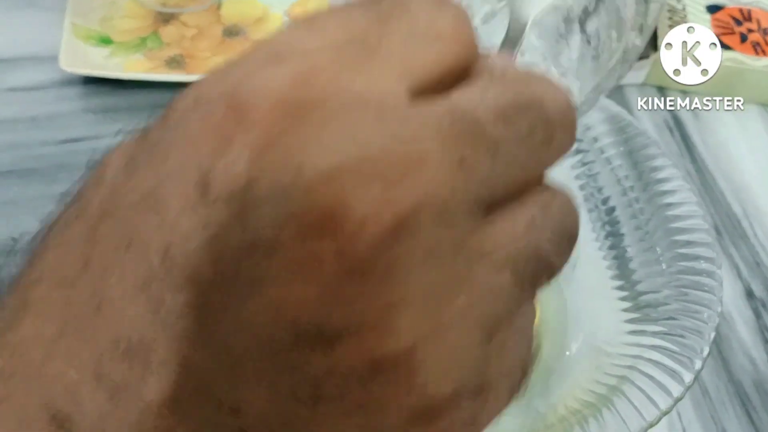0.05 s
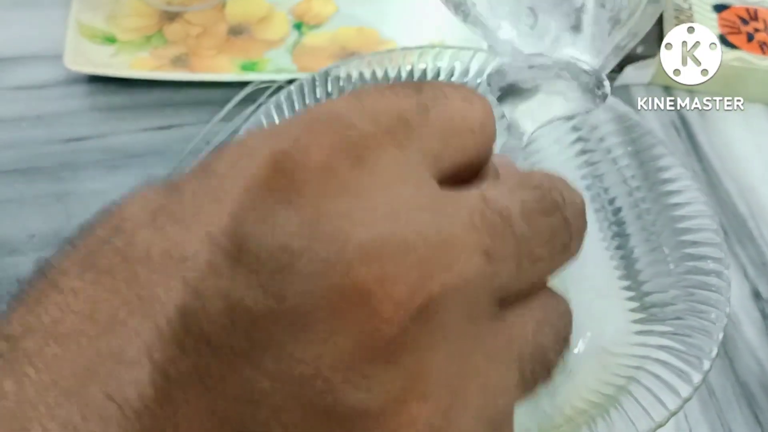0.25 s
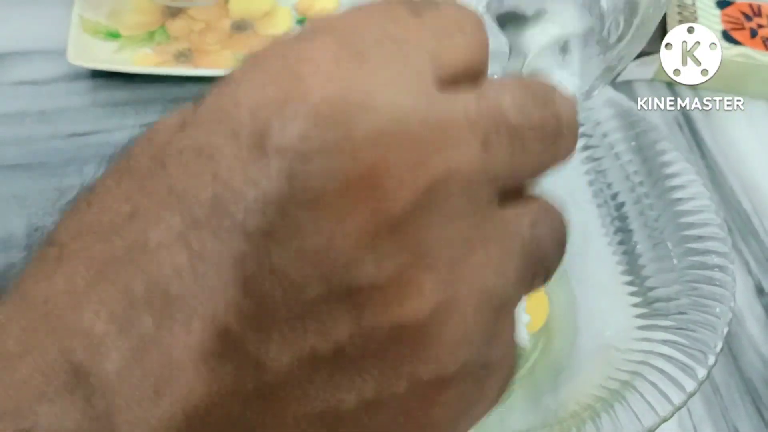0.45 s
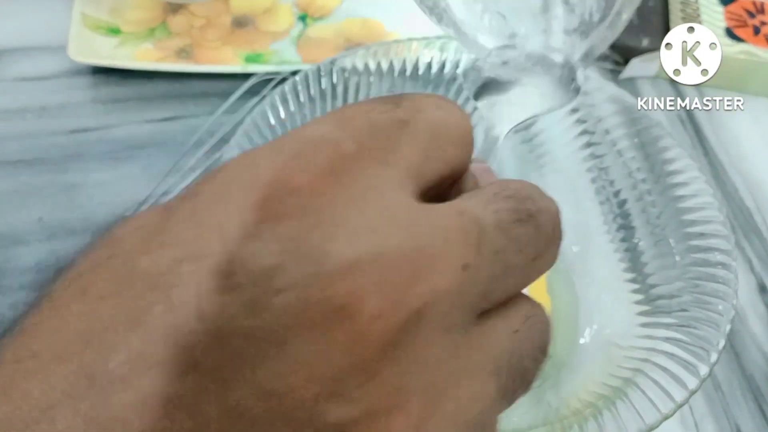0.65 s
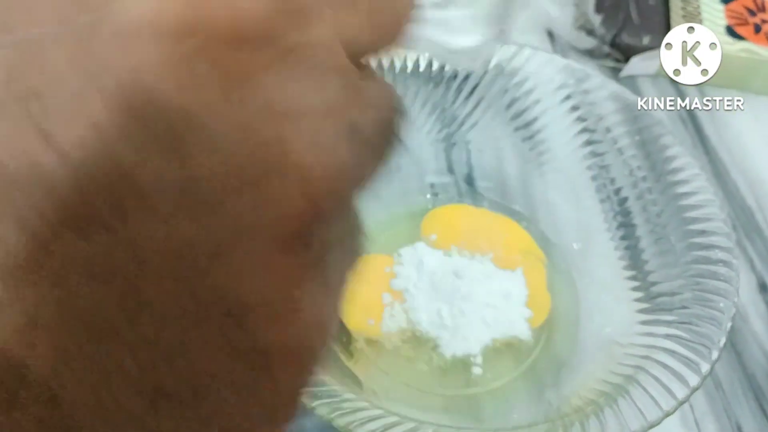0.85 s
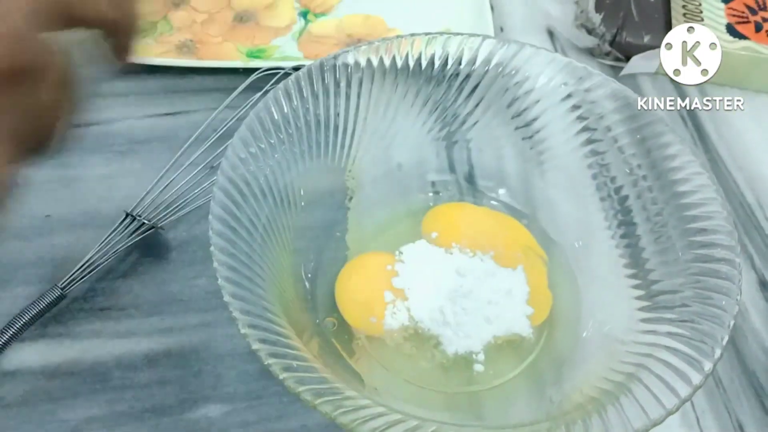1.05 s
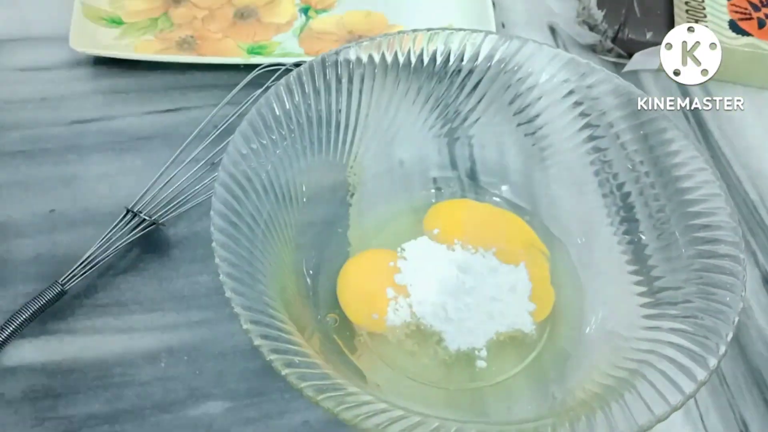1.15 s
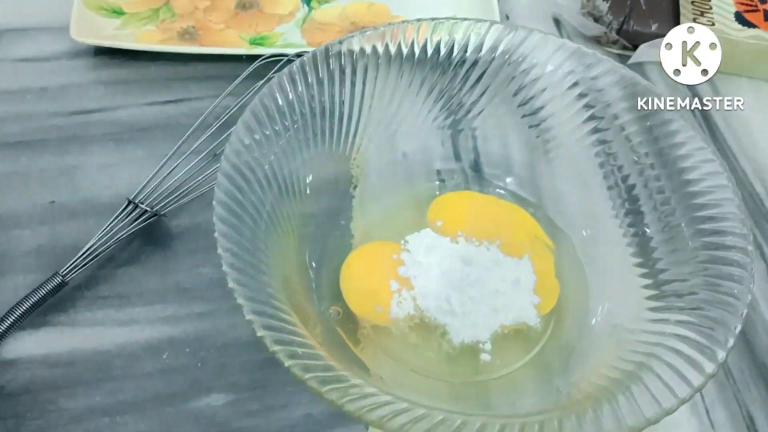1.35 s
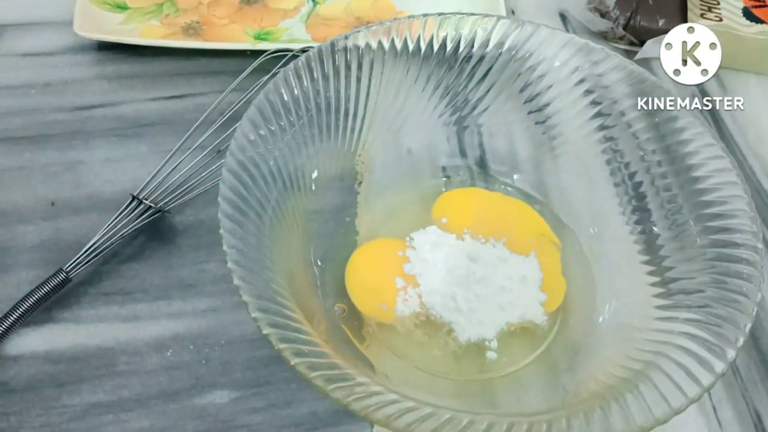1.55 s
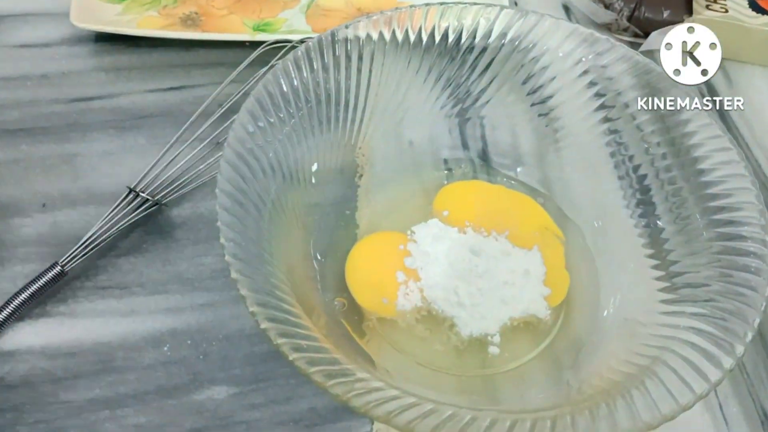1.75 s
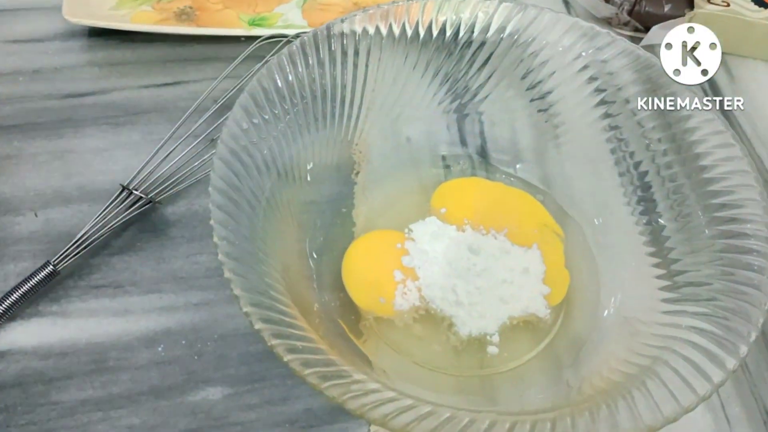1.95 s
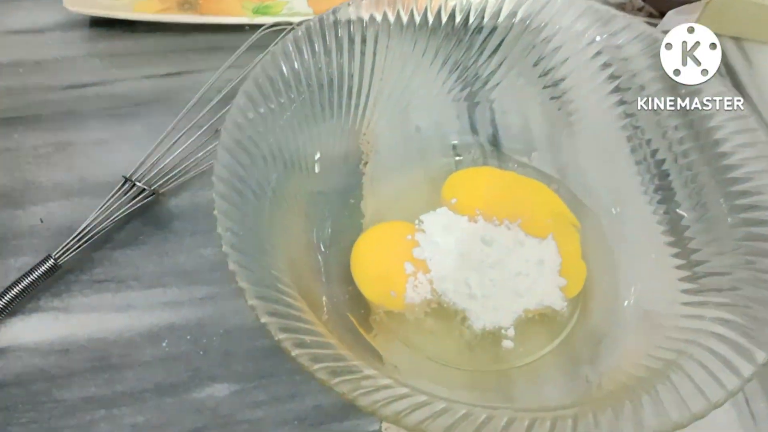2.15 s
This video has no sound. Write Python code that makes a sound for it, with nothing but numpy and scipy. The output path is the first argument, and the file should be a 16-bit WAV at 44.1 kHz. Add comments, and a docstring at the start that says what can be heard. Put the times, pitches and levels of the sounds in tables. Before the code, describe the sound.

A small glass cup taps and chatters on a glass bowl's rim, close by. The strongest clinks come at about 0.2, 0.4 and 0.7 seconds, the latter two leaving the bowl ringing. Lighter taps follow until 1.1 seconds. At 1.7 seconds the cup knocks down on a stone counter with a faint low boom, rocks flat and rings briefly. The kitchen around it is quiet.

```python
"""Glass cup on bowl and counter.

A small empty glass cup is tapped on the rim of a glass bowl: each contact is a knock, a click and a
short ring (damped modes, shaped noise). The hardest taps leave the bowl ringing. The cup is then set
down on a stone counter, which booms faintly. Small kitchen reverb over still air and a quiet mains hum."""
import sys
import numpy as np
from scipy import signal
from scipy.fft import rfft, irfft, next_fast_len
from scipy.io import wavfile

SR = 44100
rng = np.random.default_rng(int(sys.argv[2]) if len(sys.argv) > 2 else 0)


def output_pcm(signal):
    """Save a mono or channel-first signal as 16-bit PCM at the path in sys.argv[1].

    Samples are clipped to [-1, 1] before scaling.
    """
    pcm = np.clip(np.atleast_2d(signal).T, -1, 1) * 32767
    wavfile.write(sys.argv[1], SR, np.round(pcm).astype(np.int16))


N = 97020

# air spectrum: freq_hz, density_db
AIR_SPECTRUM = [(25, -8.5), (100, -2.5), (160, -9), (300, -8.5), (600, -11.5), (1000, -24), (1600, -25),
                (2500, -18.5), (7300, -19), (15500, -22.5)]
# air, left-right: freq_hz, coherence
AIR_COHERENCE = [(40, 0.93), (100, 0.27), (500, 0.3), (10000, .1)]
# mains hum: pitch_hz, rms_db
HUM_PARTIALS = [(98, -73.5), (297, -76.5)]
# kitchen reverb decay: freq_hz, t60_s
ROOM_DECAY = [(200, 1), (600, 0.35), (1500, 0.42), (3500, 0.39), (7000, 0.43), (14000, 0.26)]
# kitchen reverb colour: freq_hz, gain_db
ROOM_SPECTRUM = [(150, -5), (500, 2), (1200, -1), (3200, 2.5), (6500, -2), (9000, -1), (14000, -0.5)]
# resonances of the closing hiss: pitch_hz, level_db, t60_s
HISS_MODES = [(1530, 1, 0.0037), (4600, -9, 0.0059)]
# thuds through the counter: start_s, pitch_hz, level_db, t60_s, attack_s
COUNTER_THUDS = [(.424, 50, -53.5, 0.19, 0.0024), (.424, 125, -38, 0.044, .001),
                 (.424, 324, -31, 0.021, 0.00086)]
# grazed cup edge: pitch_hz, level_db, t60_s
TICK_MODES = [(3040, -9, 0.092), (3340, -2, 0.03), (3650, -7, 0.034)]
# cup standing free: pitch_hz, level_db, t60_s
LINGER_MODES = [(495, -1, 0.74), (2960, -1, 0.74)]
# cup on counter: start_s, knock_db, click_db, base_db, wall_db, pan_db (left minus right)
COUNTER_CONTACTS = [(1.7072, -22.5, -26, -24.5, -33, -0.5), (1.727, -42, -29.5, -45, -35, -2),
                    (1.822, -36, -35.5, -36.5, -36, -3.5), (1.835, -38, -35.5, -42.5, -33, 0)]
# cup base on stone: pitch_hz, level_db, t60_s
BASE_MODES = [(2864, -4.5, 0.2), (3350, 13, 0.014), (4120, 6.5, 0.0088), (10850, -9, 0.073)]
# knock on stone: pitch_hz, level_db, t60_s
STONE_MODES = [(437, -21, 0.063), (1292, -4, 0.026), (1664, -1, 0.021), (2045, -2, 0.014),
               (2255, -0.5, 0.017), (2760, 9, 0.0062)]
# click on stone: freq_hz, density_db
STONE_CLICK_SPECTRUM = [(150, -18), (500, -2), (2200, -0.5), (4300, -2), (8500, 0), (9900, -36),
                        (11400, 2.5), (14800, -16), (16000, -41)]
# taps that ring the bowl, one per strike point: start_s, level_db, pan_db
BOWL_STRIKES = [(.424, -23.5, -5.5), (0.6681, -33.5, -6.5)]
# bowl's free ring: pitch_hz, t60_s, split_hz, first_point_db, second_point_db
BOWL_CLUSTERS = [(2860, .4, 50, -14, 0), (3320, .54, 80, -1, -1.5), (6385, .46, 48, -4, 0),
                 (7515, .45, 48, -4, -12), (8515, .4, 35, -25, -5), (11780, .4, 50, -17, -24),
                 (13065, .4, 50, -23, -7), (14190, .35, 50, -24, -16)]
# extra chinks on four rim taps: start_s, pitch_hz, level_db, t60_s
TAP_CHINKS = [(0.2315, 1524, -33, 0.033), (0.2713, 2480, -30, 0.023), (0.932, 1726, -45.5, 0.054),
              (1.083, 3430, -34, 0.037)]
# bowl's damped knock: pitch_hz, level_db, t60_s
KNOCK_MODES = [(494.4, -17, 0.099), (1221, 7.5, 0.0097), (1472, 2.5, 0.013), (1705, -0.5, 0.01)]
# click on the rim: freq_hz, density_db
RIM_CLICK_SPECTRUM = [(200, -33.5), (900, -10.5), (2700, -2), (3800, 0), (4800, 2.5), (6800, -2),
                      (8500, 0.5), (9700, -9.5), (12000, -3), (14400, -17), (16000, -33)]
# cup modes in five families, low to high: pitch_hz, level_db, t60_s
CUP_FAMILIES = [
    [(2870, -7, .035), (3335, 0, .045)],
    [(6388, 0, .045)],
    [(7540, 0, .035), (8560, -2, .032)],
    [(11450, -6, .02), (11790, 0, .03)],
    [(12370, -5, .035), (13090, 0, .04), (14250, -11, .035)],
]
# cup on rim: start_s, knock_db, click_db, five family_db, pan_db
RIM_CONTACTS = [(.001, -47.5, -39.5, -39.5, -56, -83, -71, -45, -1.5),
                (0.021, -46.5, -39.5, -42, -37, -40, -49, -42, -2),
                (0.035, -47, -39.5, -67, -42, -43, -41.5, -45, -2),
                (0.2017, -48, -18, -35, -42, -30, -23.5, -17.5, -1),
                (0.2315, -26, -27, -34, -35, -30, -48, -62, -1.5),
                (0.2341, -44.5, -30.5, -47, -57, -32, -47, -29.5, -9),
                (0.2687, -37, -42, -57, -60, -61, -65, -58, 0.5),
                (0.272, -59, -37, -35, -48, -39.5, -61, -57, 1),
                (.424, -47, -24.5, -26.5, -16, -28.5, -23.5, -31, 0),
                (0.445, -47.5, -23.5, -34, -50, -43, -46, -51, 0.5),
                (0.6682, -30.5, -21, -17.5, -17, -27, -46, -26.5, 2),
                (0.7547, -45, -29, -34, -34.5, -45, -58, -43, -1),
                (.835, -43, -40.5, -38.5, -60, -53, -69, -41.5, -6.5),
                (.845, -50.5, -42.5, -46, -60, -42, -60, -49, 10),
                (0.932, -53.5, -39, -51, -60, -47.5, -56, -48, -7.5),
                (.948, -63, -44, -57, -66, -63, -66, -62, 6),
                (1.083, -70, -38, -36.5, -35, -41, -44, -41, -6.5),
                (1.1, -59, -36.5, -40.5, -54.5, -38, -45, -52, -3.5),
                (1.109, -79, -38, -48, -33.5, -45.5, -42, -75, -2)]

RIM_CLICK_T60_S, RIM_LAG_S, RIM_ROOM_DB = 0.052, 0.00013, -7
STONE_CLICK_T60_S, STONE_LAG_S, STONE_ROOM_DB = 0.098, 0.000434, -3
BUILD_S, KNOCK_SPREAD_RAD = 0.00085, 0.2
SCENE_TIME_S, RING_TIME_S = np.arange(N) / SR, np.arange(SR) / SR
PAN_SPLIT = np.array([[.5], [-.5]])


def amp(db):
    """Decibels to gain."""
    return 10 ** (np.asarray(db) / 20)


def along(points, hz):
    """Interpolate (freq_hz, value) points on a log frequency axis."""
    freqs_hz, values = np.transpose(points)
    return np.interp(np.log(hz + 1), np.log(freqs_hz + 1), values)


def rise(attack_s, t=RING_TIME_S):
    """Exponential onset, 0 to 1."""
    return 1 - np.exp(-t / attack_s)


def burst(x, window_s=0.01):
    """Scale a transient to the energy of rms 1 over window_s."""
    return x / np.sqrt(np.mean(np.sum(x ** 2, -1)) / (window_s * SR) + 1e-20)


def filtered(x, response):
    """Apply a frequency response."""
    n = x.shape[-1]
    padded = next_fast_len(n + 8192)
    return irfft(rfft(x, padded) * response(np.fft.rfftfreq(padded, 1 / SR)), padded)[..., :n]


def at(start_s, x):
    """x on a silent stereo track, from start_s."""
    out, i = np.zeros((2, N)), round(start_s * SR)
    out[:, i:i + x.shape[-1]] = x[..., :N - i]
    return out


def ring(modes, spread_rad, scatter_db=2, attack_s=0.0007):
    """Damped modes, normalised; level and phase scatter per channel."""
    t, y = RING_TIME_S, 0
    for hz, db, t60_s in modes:
        envelope = amp(db + scatter_db * rng.standard_normal((2, 1)) - 60 * t / t60_s)
        y = y + envelope * np.sin(2 * np.pi * hz * t + spread_rad * rng.standard_normal((2, 1)))
    return burst(y * rise(attack_s))


def click(spectrum, t60_s, hold_s=0.0016, attack_s=0.00061, coherence=0.37):
    """Dense contact modes as noise; sound bounces between the glass walls for hold_s, then dies."""
    t = RING_TIME_S
    common = np.sqrt(coherence) * rng.standard_normal(len(t))
    separate = np.sqrt(1 - coherence) * rng.standard_normal((2, len(t)))
    noise = filtered(common + separate, lambda hz: amp(along(spectrum, hz)))
    fade = amp(-60 * np.maximum(t - hold_s, 0) / t60_s)
    return burst(noise * fade * rise(attack_s))


def in_kitchen(x, pan_db, lag_s, room_db):
    """Direct sound, lag_s later on the left, plus a diffuse reverb tail."""
    hz, t, noise = signal.stft(rng.standard_normal((2, int(.6 * SR))), SR, nperseg=256)
    fade = amp(-60 * t / along(ROOM_DECAY, hz)[:, None]) * rise(BUILD_S, t)
    tail = signal.istft(noise * fade, SR, nperseg=256)[1]
    wet = signal.fftconvolve(x, tail / np.linalg.norm(tail[0]), axes=1)[:, :x.shape[1]]
    wet = filtered(wet, lambda f: amp(room_db + along(ROOM_SPECTRUM, f)))
    direct = filtered(x, lambda f: np.exp(-2j * np.pi * f * lag_s * PAN_SPLIT))
    return amp(PAN_SPLIT * pan_db) * (direct + wet)


def room_tone(air_db=-63.5):
    """Still air and an appliance's mains hum."""
    def mid_side_gains(hz):
        angle_rad = np.arccos(along(AIR_COHERENCE, hz)) / 2
        return amp(along(AIR_SPECTRUM, hz)) * [np.cos(angle_rad), np.sin(angle_rad)]

    mid, side = filtered(rng.standard_normal((2, N)), mid_side_gains)
    air = np.array([mid + side, mid - side])
    hum = sum(amp(db) * np.sqrt(2) * np.sin(2 * np.pi * (hz * SCENE_TIME_S + rng.random()))
              for hz, db in HUM_PARTIALS)
    return amp(air_db) * air / air.std() + hum


def closing_hiss(start_s=1.897, rise_s=0.21, level_db=-63):
    """A faint hiss with two soft resonances swells at the end."""
    noise = rng.standard_normal(N) * rng.exponential(size=N)
    hiss = signal.fftconvolve(noise[None], ring(HISS_MODES, spread_rad=0.79), axes=1)[:, :N]
    swell = np.clip((SCENE_TIME_S - start_s) / rise_s, 0, 1)
    return in_kitchen(amp(level_db) * swell * hiss / hiss.std(), 0, STONE_LAG_S, STONE_ROOM_DB)


def counter_boom(start_s=1.708, pitch_hz=77.4, level_db=-49.5, attack_s=0.0063, hold_s=0.17, t60_s=0.95):
    """The counter hums low after the landing: swell, hold, fade."""
    t = np.maximum(SCENE_TIME_S - start_s, 0)
    fade = amp(level_db - 60 * np.maximum(t - hold_s, 0) / t60_s)
    return fade * rise(attack_s, t) * np.sin(2 * np.pi * pitch_hz * t)


def counter_thuds():
    """The heaviest tap pushes the bowl onto the counter."""
    t, out = RING_TIME_S, 0
    for start_s, hz, db, t60_s, attack_s in COUNTER_THUDS:
        envelope = amp(db - 60 * t / t60_s) * rise(attack_s)
        out += at(start_s, envelope * np.sin(2 * np.pi * hz * t))
    return out


def edge_tick(start_s=1.668, ring_db=-48.5, click_db=-55):
    """The cup's edge grazes something on its way down."""
    hit = amp(ring_db) * ring(TICK_MODES, spread_rad=1.0)
    hit += amp(click_db) * click(STONE_CLICK_SPECTRUM, STONE_CLICK_T60_S)
    return at(start_s, in_kitchen(hit, pan_db=-10.5, lag_s=STONE_LAG_S, room_db=-3.5))


def cup_linger(level_db=-35.5):
    """Let go on landing, the cup rings on."""
    landing_s = COUNTER_CONTACTS[0][0]
    return at(landing_s, amp(level_db) * ring(LINGER_MODES, KNOCK_SPREAD_RAD))


def cup_set_down():
    """The cup lands on stone and rocks flat, its wall chiming."""
    out = 0
    for start_s, knock_db, click_db, base_db, wall_db, pan_db in COUNTER_CONTACTS:
        hit = amp(knock_db) * ring(STONE_MODES, KNOCK_SPREAD_RAD)
        hit += amp(click_db) * click(STONE_CLICK_SPECTRUM, STONE_CLICK_T60_S)
        hit += amp(base_db) * ring(BASE_MODES, spread_rad=0.97)
        hit += amp(wall_db) * ring(CUP_FAMILIES[1], spread_rad=0.42)
        out += at(start_s, in_kitchen(hit, pan_db, STONE_LAG_S, STONE_ROOM_DB))
    return out


def beating_modes(hz, t60_s, split_hz, count=20):
    """Close modes beat against each other, differently in each channel."""
    t = RING_TIME_S
    modes_hz = hz + split_hz * rng.laplace(size=(count, 1))
    phase_rad = 2 * np.pi * rng.random((2, count))
    fade = amp(-60 * t / t60_s) * rise(BUILD_S)
    y = fade * np.real(np.exp(1j * phase_rad) @ np.exp(2j * np.pi * modes_hz * t))
    return y * np.linalg.norm(fade) / np.linalg.norm(y, axis=1, keepdims=True)


def bowl_ring():
    """The bowl rings on after a clean rebound; each strike point favours other modes."""
    out = 0
    for point, (start_s, db, pan_db) in enumerate(BOWL_STRIKES):
        chime = sum(amp(point_db[point]) * beating_modes(hz, t60_s, split_hz)
                    for hz, t60_s, split_hz, *point_db in BOWL_CLUSTERS)
        out += at(start_s, amp(db + PAN_SPLIT * pan_db) * chime)
    return out


def tap_chinks():
    """Extra pitched chinks on four of the rim taps, one damped mode each."""
    out = 0
    for start_s, hz, db, t60_s in TAP_CHINKS:
        chink = amp(db) * ring([(hz, 0, t60_s)], spread_rad=0.51)
        out += at(start_s, in_kitchen(chink, 0, RIM_LAG_S, RIM_ROOM_DB))
    return out


def rim_taps(swell_s=0.00049):
    """The hand-damped cup hits and chatters on the rim; the contact point picks the modes."""
    out = 0
    for start_s, knock_db, click_db, *family_db, pan_db in RIM_CONTACTS:
        hit = amp(knock_db) * ring(KNOCK_MODES, KNOCK_SPREAD_RAD)
        hit += amp(click_db) * click(RIM_CLICK_SPECTRUM, RIM_CLICK_T60_S)
        for db, modes in zip(family_db, CUP_FAMILIES):
            hit += amp(db) * burst(rise(swell_s) * ring(modes, spread_rad=1.0))
        out += at(start_s, in_kitchen(hit, pan_db, RIM_LAG_S, RIM_ROOM_DB))
    return out


def scene():
    """Stereo mix of glass, hiss, counter and room."""
    glass = rim_taps() + tap_chinks() + bowl_ring() + edge_tick() + cup_set_down() + cup_linger()
    return glass + closing_hiss() + counter_thuds() + counter_boom() + room_tone()


def record(dry):
    """Steep low-pass band limit."""
    cutoff_hz = 15700
    return filtered(dry, lambda hz: 1 / np.sqrt(1 + (hz / cutoff_hz) ** 120))


dry = scene()
out = record(dry)
output_pcm(out)
```